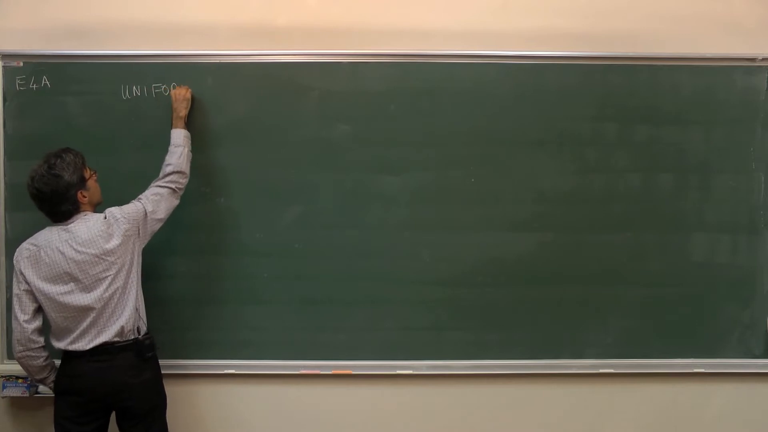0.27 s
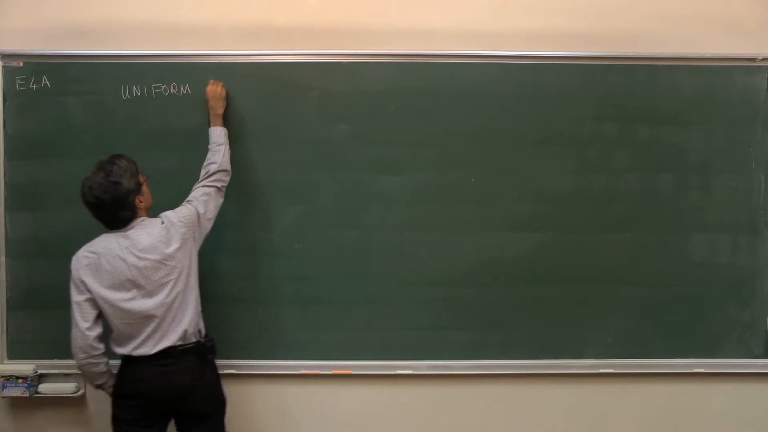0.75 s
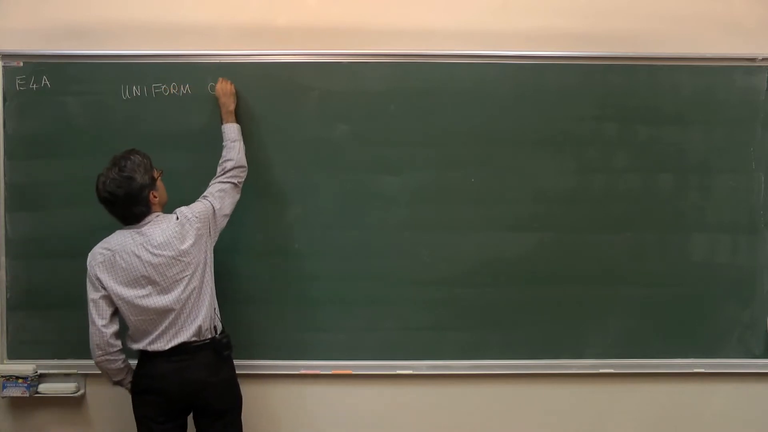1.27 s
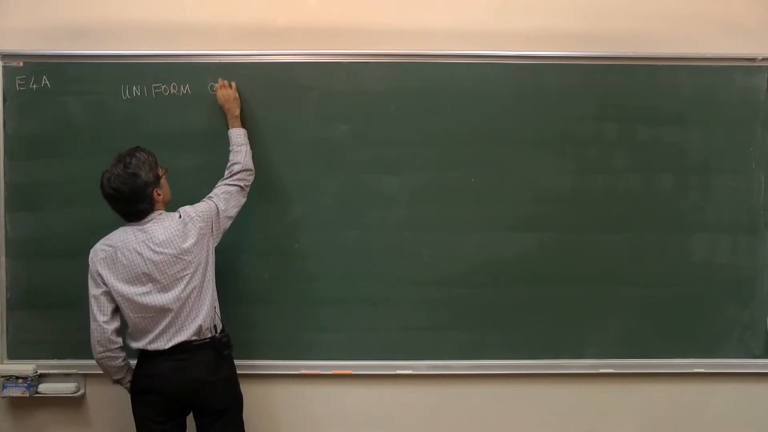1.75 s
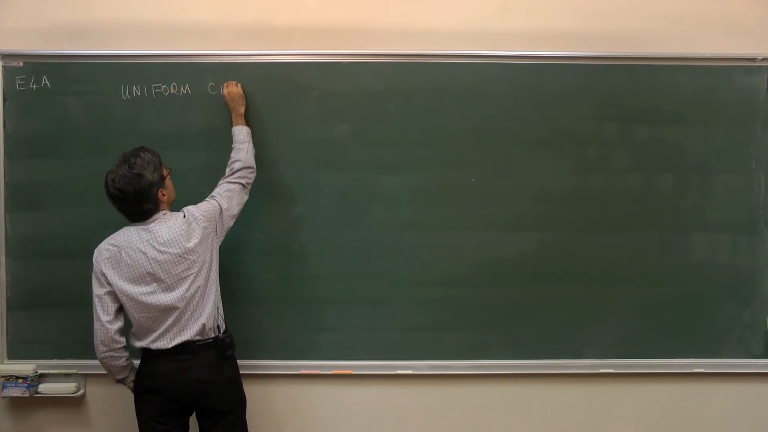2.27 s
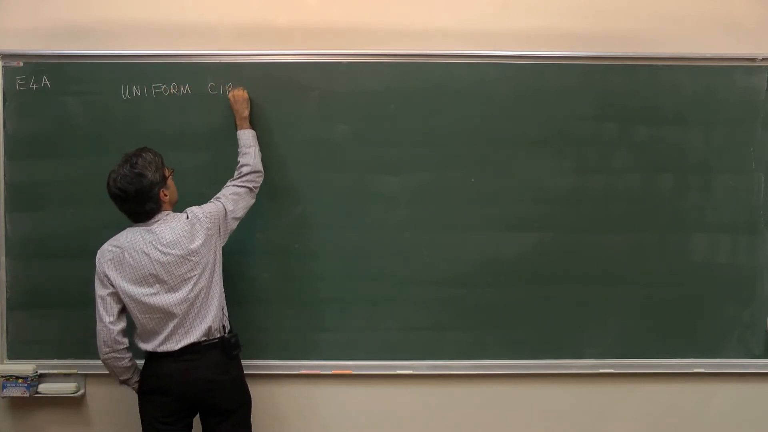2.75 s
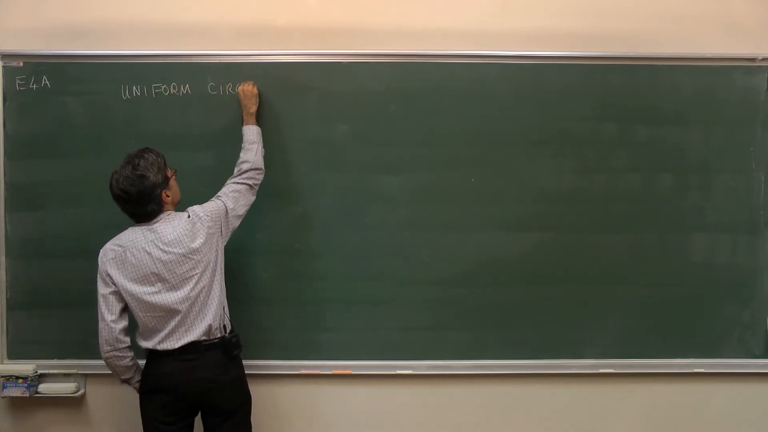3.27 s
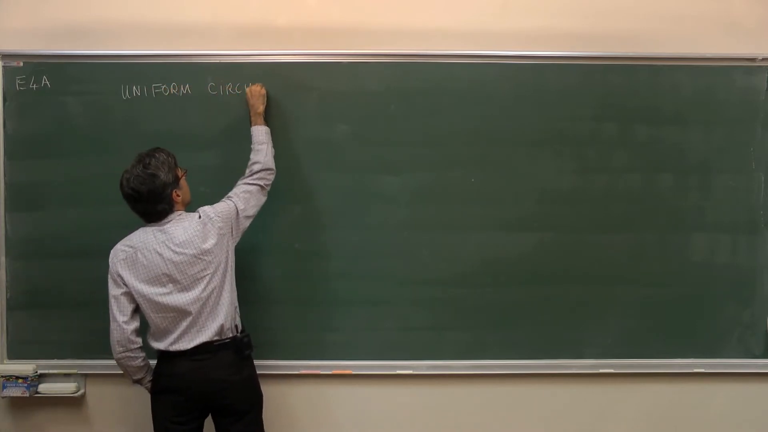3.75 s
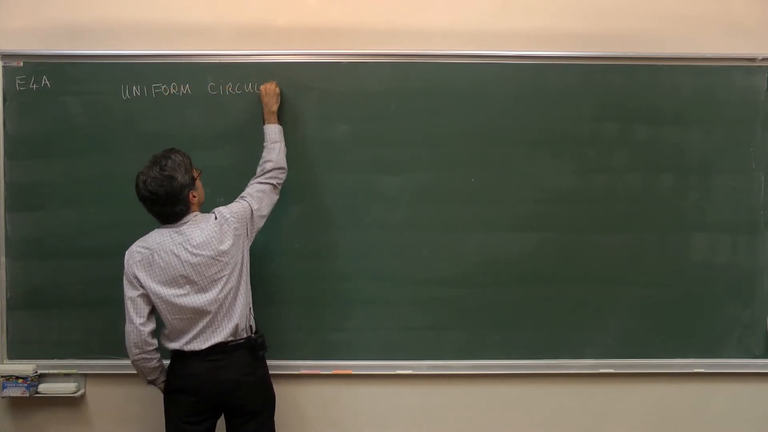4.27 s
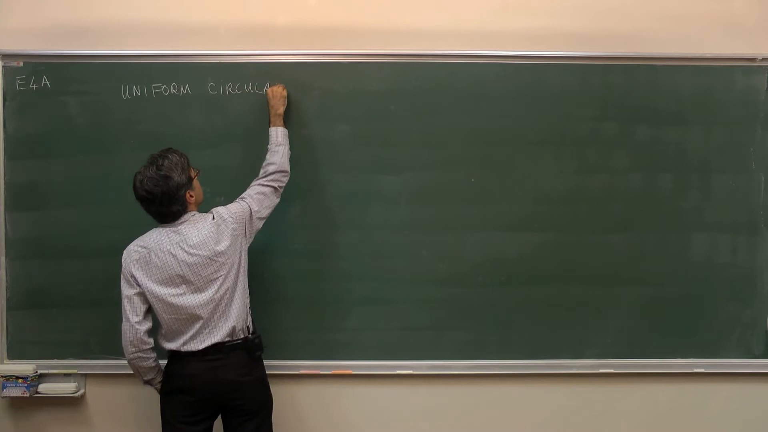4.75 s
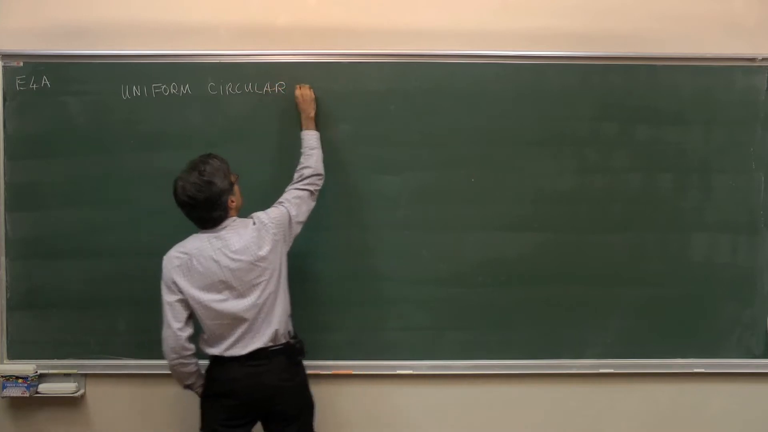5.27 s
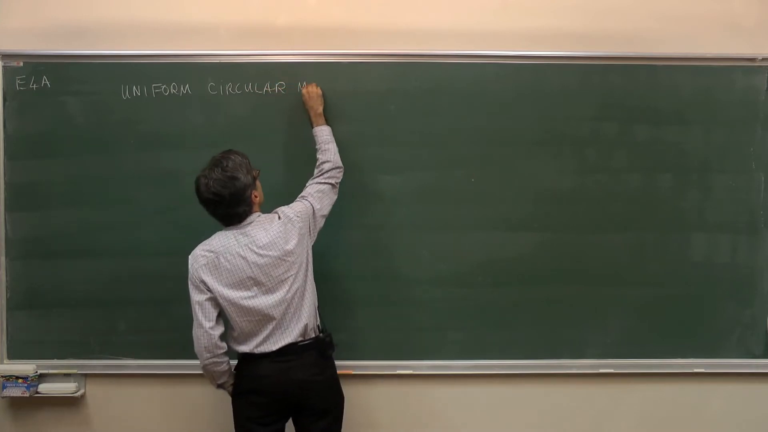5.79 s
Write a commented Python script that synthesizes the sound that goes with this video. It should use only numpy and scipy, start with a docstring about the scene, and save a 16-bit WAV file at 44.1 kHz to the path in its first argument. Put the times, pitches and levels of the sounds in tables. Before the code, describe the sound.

Chalk knocks hard on a blackboard and hisses in short scratchy strokes as someone writes capital letters in a quiet, lightly echoing room.

```python
"""Chalk capitals on a blackboard

Capital letters are written with chalk on a wall blackboard in a lecture room, over faintly rumbling ventilation.
The stick lands with hard knocks: damped modes of the spot and the panel, a noise wash, echoes and a room tail.
Filtered noise then hisses along each stroke under the swing of the hand and drives a panel mode; crumbs snap.
On some strokes the stick rasps in a rising resonance, and twice it shudders as a stroke ends."""
import sys
import numpy as np
from scipy import signal
from scipy.fft import rfft, irfft, next_fast_len
from scipy.io import wavfile

SR = 44100
rng = np.random.default_rng(int(sys.argv[2]) if len(sys.argv) > 2 else 0)


def inscribe(sig):
    """Save sig as 16-bit PCM at rate SR to the path in sys.argv[1].

    A 1-D sig is mono; a 2-D sig holds one channel per row.
    Samples are clipped to [-1, 1] before scaling.
    """
    pcm = np.round(np.clip(np.atleast_2d(sig).T, -1, 1) * 32767)
    wavfile.write(sys.argv[1], SR, pcm.astype(np.int16))


N = 265482
TIME = np.arange(N) / SR
TAIL = TIME[:SR * 4 // 5]  # time axis of one blow or tail, 0.8 s

# chalk landings: [t/s, level/dB, knock f/Hz, upper-middle edge/dB, treble crack/dB]
# the knock pitch acts relative to the mean of its column
LANDINGS = [(0.0952, -21, 1782, 5, -14.5), (0.8055, -21.5, 1750, 18, -19.5), (1.1178, -17.5, 1857, 14, -15),
            (1.3948, -20, 1870, 10.5, -11.5), (2.3045, -23.5, 1700, 10.5, -9), (2.9227, -21, 1666, 4.5, -5),
            (3.2977, -21, 1645, 9, -4.5), (3.7234, -23, 1670, 8, 0), (4.05, -22, 1850, 10, -7),
            (4.2592, -20.5, 1870, 11.5, -4.5), (4.4753, -19.5, 1670, 8, -5), (4.6582, -22.5, 1864, 9.5, 2),
            (5.3677, -22, 1670, 12, -7), (5.9487, -24, 1910, 12.5, -6)]

# the panel's drumming mode weakens as the hand travels away from the panel's edge
BOOM_HZ, BOOM_T60_S = 261.5, 0.25
BOOM_START_DB, BOOM_FADE_DB_PER_S = -2, 8


def from_db(db):
    """Turn decibels into an amplitude factor."""
    return 10 ** (np.asarray(db) / 20)


def rms_one(x):
    """Scale to rms 1."""
    return x / np.sqrt(np.mean(x ** 2) + 1e-20)


def unit_blow(x):
    """Scale to the energy of ten milliseconds at rms 1."""
    return x * np.sqrt(SR / 100 / np.sum(x ** 2))


def at_hz(points, hz):
    """Read a table on a log-frequency axis."""
    f, value = np.transpose(points)
    return np.interp(np.log(np.maximum(hz, 1)), np.log(f), value)


def add(track, start_s, sound):
    """Mix a sound into a track from a given time."""
    i = max(0, round(start_s * SR))
    track[i:i + len(sound)] += sound[:N - i]


def band(x, low_hz, high_hz, order=2):
    """Keep one frequency band."""
    edges = [low_hz, min(high_hz, .45 * SR)]
    return signal.sosfilt(signal.butter(order, edges, "band", fs=SR, output="sos"), x + 1e-18)


def peak(x, centre_hz, gain_db, q):
    """A bell-shaped lift or cut around one frequency."""
    w = 2 * np.pi * min(centre_hz, .45 * SR) / SR
    a = from_db(gain_db / 2)
    k = np.sin(w) / (2 * q)
    numerator = [1 + k * a, -2 * np.cos(w), 1 - k * a]
    denominator = [1 + k / a, -2 * np.cos(w), 1 - k / a]
    return signal.lfilter(numerator, denominator, x)


def coloured(spectrum, size):
    """Noise with a given spectrum, rms 1."""
    n = next_fast_len(size)
    white = rfft(rng.standard_normal(n))
    gain = from_db(at_hz(spectrum, np.fft.rfftfreq(n, 1 / SR)))
    return rms_one(irfft(white * gain, n)[:size])


def drift(rate_hz):
    """Smooth random wandering, rms 1, from white noise through two equal lowpass poles."""
    r = np.exp(-2 * np.pi * rate_hz / SR)
    noise = rng.standard_normal(N + SR)
    return rms_one(signal.lfilter([1], [1, -2 * r, r * r], noise)[SR:])


def ring(hz, db, t60_s):
    """One struck mode: a sine that decays exponentially."""
    return from_db(db - 60 * TAIL / max(t60_s, 1e-4)) * np.sin(2 * np.pi * hz * TAIL)


def ventilation(level_db=-62.5):
    """Steady air noise, strongest in the bass."""
    # air spectrum: [f/Hz, level/dB]
    air_colour = [(20, -36.5), (40, -8), (55, -9), (80, -2), (110, -9), (145, -7), (250, -11), (480, -21.5),
                  (1100, -25), (2000, -30), (4500, -38.5), (9000, -39), (16000, -43.5)]
    return from_db(level_db) * coloured(air_colour, N)


def room_tail(colour, build_s=0.0023):
    """Diffuse reverberation that builds up quickly and decays at a different rate in each frequency region."""
    # room decay: [f/Hz, t60/s]
    decay_times = [(80, 1), (300, 0.53), (700, 0.33), (2000, 0.48), (5000, 0.42), (14000, 0.059)]
    noise = rfft(coloured(colour, len(TAIL)))
    hz = np.fft.rfftfreq(len(TAIL), 1 / SR)
    centres, t60s = np.transpose(decay_times)
    tail = np.zeros(len(TAIL))
    for one, t60_s in zip(np.eye(len(centres)), t60s):
        share = at_hz(np.c_[centres, one], hz)  # overlapping bands that sum to one
        tail += irfft(noise * share, len(TAIL)) * from_db(-60 * TAIL / t60_s)
    return unit_blow(tail * (1 - np.exp(-TAIL / build_s)))


def sliding_in_room(sliding, wet_db=-11):
    """The room carries the sliding chalk on into its pauses, by convolution with a diffuse tail."""
    # colour of the room for the sliding sounds: [f/Hz, level/dB]
    sliding_colour = [(200, 0), (2000, -6.5), (8000, -10.5), (16000, 0.5)]
    tail = room_tail(sliding_colour)
    wet = signal.fftconvolve(sliding.mean(axis=0), tail / np.linalg.norm(tail))[:N]
    return from_db(wet_db) * wet


def boom_level(s):
    """How strongly the drumming mode answers at the place the hand has reached by time s, in dB."""
    return BOOM_START_DB - BOOM_FADE_DB_PER_S * s


def drumming(friction, width_hz=19, drive_db=24.5):
    """Friction keeps the panel's drumming mode going through a narrow resonator."""
    r = np.exp(-np.pi * width_hz / SR)
    drive = friction * from_db(boom_level(TIME) + drive_db)
    numerator = np.array([1, 0, -1]) * (1 - r * r) / 2
    denominator = [1, -2 * r * np.cos(2 * np.pi * BOOM_HZ / SR), r * r]
    return signal.lfilter(numerator, denominator, drive + 1e-18)


def crumbs(t60_s=0.02):
    """Larger crumbs snap under the tip, each a short dry burst of decaying band noise."""
    # snaps: [t/s, level/dB]
    snaps = [(4.19, -58), (5.127, -48)]
    out = np.zeros(N)
    for s, db in snaps:
        crackle = band(rng.standard_normal(len(TAIL)), 1200, 7500) * from_db(-60 * TAIL / t60_s)
        add(out, s, from_db(db) * unit_blow(crackle))
    return out


def shudders(t60_s=0.1, rise_s=.004, bump_db=-2.0, bounce_db=-5):
    """A few quick bounces of the tip as a fast-fading sine, over a dull noise bump of the board."""
    # shudders as the stick leaves the board: [t/s, bounce f/Hz, level/dB]
    departures = [(0.5635, 512, -38.5), (5.1632, 500, -40.5)]
    out = np.zeros(N)
    for s, hz, db in departures:
        fade = np.exp(-(hz * TAIL / 4) ** 2)
        bounces = 2 * from_db(bounce_db) * np.sin(2 * np.pi * hz * TAIL) * fade
        thump = rms_one(band(rng.standard_normal(len(TAIL)), hz / 2, hz * 1.2))
        bump = from_db(bump_db - 60 * TAIL / t60_s) * thump
        add(out, s, from_db(db) * (1 - np.exp(-TAIL / rise_s)) * (bounces + bump))
    return out


def rasps(width_hz=310, rise_oct_per_s=3.5, rasp_db=-1.5, chatter_db=3.0):
    """Uneven stick-slip drives a rising resonance of the stick and shakes the board under it."""
    # rasps: [start t/s, end t/s, mid-rasp f/Hz, level/dB]
    rasp_spans = [(0.158, 0.256, 2715, -50.5), (0.384, 0.472, 2740, -51), (0.526, 0.602, 2270, -62),
                  (2.482, 2.548, 2240, -57), (2.668, 2.7, 3350, -56.5), (3.469, 3.523, 3055, -54.5),
                  (4.801, 4.862, 3250, -54), (4.987, 5.045, 2940, -51.5), (5.11, 5.149, 1967, -54.5),
                  (5.514, 5.575, 2770, -55), (5.657, 5.732, 2870, -57)]
    out = np.zeros(N)
    sway = drift(width_hz) + 1j * drift(width_hz)  # widens the moving tone into narrow noise
    board = rms_one(band(rng.standard_normal(N), 1400, 3500, order=3))
    for start, end, mid_hz, db in rasp_spans:
        length = max(end - start, .01)
        along = np.clip((TIME - start) / length, 0, 1)
        pitch_hz = mid_hz * 2 ** (rise_oct_per_s * length * (along - .5))
        phase = 2 * np.pi * np.cumsum(pitch_hz) / SR
        stick = (sway * np.exp(1j * phase)).real
        swell = 2 * np.sqrt(along * (1 - along))
        out += from_db(db) * swell * (stick + board)
    return out * from_db(rasp_db + chatter_db * drift(190))


def ridges(hz, spacing_hz):
    """An uneven random row of peaks and dips across frequency, spread about 1."""
    knots = np.arange(0, SR, spacing_hz)
    return np.interp(hz, knots, rng.standard_normal(len(knots))) * np.sqrt(3 / 2)


def hand_speed(size, lifts, lift_at=0.7, swell=0.5, release_s=0.009):
    """The hand speeds up and slows to a stop at the next turn, unless the chalk lifts off first."""
    along = np.linspace(0, lift_at if lifts else 1, size)  # fraction of the swing
    release = np.minimum(np.arange(size)[::-1] / (release_s * SR), 1)
    return np.abs(np.sin(np.pi * along)) ** swell * release


def strokes(grain_db=1.56, pressure_db=2.1, level_db=0.9, side_db=-13):
    """Grains break off the sliding tip; stick and board filter them through ridges that shift with every stroke."""
    # strokes of the letters, each one swing of the hand, and a few faint brushes between them: [start t/s, end
    # t/s, hiss level/dB]
    swings = [(0.148, 0.261, -61.5), (0.273, 0.375, -63.5), (0.387, 0.472, -60.5), (0.493, 0.599, -62.5),
              (0.728, 0.836, -70.5), (0.801, 1.06, -60.5), (1.002, 1.088, -72), (1.132, 1.225, -65),
              (1.443, 1.476, -68), (1.721, 1.84, -85.5), (1.919, 2.055, -74), (2.323, 2.435, -63),
              (2.456, 2.562, -59.5), (2.564, 2.656, -63.5), (2.672, 2.702, -68), (2.723, 2.825, -62),
              (2.921, 3.15, -66.5), (3.294, 3.43, -66), (3.437, 3.52, -63), (3.543, 3.643, -65),
              (3.644, 3.665, -60), (3.727, 3.86, -66.5), (3.863, 3.947, -66), (4.044, 4.169, -62.5),
              (4.186, 4.194, -55), (4.258, 4.394, -62.5), (4.491, 4.6, -63), (4.654, 4.768, -61),
              (4.789, 4.977, -61), (4.969, 5.047, -62.5), (5.079, 5.161, -62.5), (5.381, 5.53, -60.5),
              (5.525, 5.638, -61), (5.644, 5.73, -61), (5.748, 5.854, -62), (5.859, 5.885, -61.5),
              (5.97, 6.034, -61)]
    # chalk crumbling on the board: [f/Hz, level/dB]
    hiss_colour = [(100, 1.5), (300, 11.5), (900, 5.5), (1700, 6.5), (2700, 7), (4500, 3), (5600, 3.5),
                   (7200, -.5), (8700, 2), (10800, -5.5), (12800, -4.5), (14700, -2.5), (16000, -4.5)]
    lift_pause_s = 0.06  # a longer pause means the chalk lifts off
    fresh_sheen_db, worn_sheen_db, wear_s = 7.0, 0.0, 0.7  # a fresh edge hisses higher, then wears blunt
    n = next_fast_len(SR // 2)
    hz = np.fft.rfftfreq(n, 1 / SR)
    board_db = at_hz(hiss_colour, hz)
    top = at_hz([(9000, 0), (14000, 1)], hz)  # where the sheen acts
    out, effort = np.zeros(N), np.zeros(N)
    next_starts = [row[0] for row in swings[1:]] + [np.inf]
    for (start, end, db), next_start in zip(swings, next_starts):
        size = int(np.clip((end - start) * SR, 2, n))
        speed = from_db(db) * hand_speed(size, next_start - end > lift_pause_s)
        sheen_db = worn_sheen_db + (fresh_sheen_db - worn_sheen_db) * np.exp(-start / wear_s)
        colour_db = board_db + sheen_db * top + 2.6 * ridges(hz, spacing_hz=200)
        noise = irfft(rfft(rng.standard_normal(n)) * from_db(colour_db), n)
        noise = noise / np.std(band(noise, 6500, 16000))  # even treble from stroke to stroke
        add(out, start, speed * noise[:size])
        add(effort, start, speed)
    spread = from_db(side_db) * effort * rms_one(band(rng.standard_normal(N), 3500, 16700))
    stereo = out + spread * np.array([[1], [-1]])  # opposite sign left and right widens the hiss
    return from_db(level_db + grain_db * drift(210) + pressure_db * drift(25)) * stereo


def disperse(x, centre_hz, width_hz):
    """Smear the attack as bending waves do: an allpass delays the region around one frequency most."""
    r = np.exp(-np.pi * width_hz / SR)
    a = [1, -2 * r * np.cos(2 * np.pi * centre_hz / SR), r * r]
    return signal.lfilter(a[::-1], a, x + 1e-18)


def knock(pitch_hz, echo_hz=7000, crush_db=-18, crush_t60_s=0.012, contact_s=0.00068):
    """The first crack of a landing: damped modes, a crushing tip and early returns of varying path length."""
    # the spot under the chalk, heavily damped: [f/Hz, level/dB, t60/s]
    spot_modes = [(1890, 6, 0.0034), (120.4, 3.5, 0.0056), (2950, 7.5, 0.0019), (291, -15, 0.014),
                  (5400, -12, .006), (8500, 3.5, 0.00094), (14310, -45.5, .003)]
    # early returns from the frame, ceiling and floor: [delay t/s, level/dB]
    early_returns = [(.0028, -10), (.0039, -15), (.0056, -16), (.0222, -19), (.0262, -19)]
    stretch = pitch_hz / np.mean(np.array(LANDINGS)[:, 2])
    contact = 1 - np.exp(-TAIL / contact_s)
    modes = sum((-1) ** k * ring(hz * stretch, db, t60_s) for k, (hz, db, t60_s) in enumerate(spot_modes))
    direct = unit_blow(disperse(contact * modes, centre_hz=1574, width_hz=330))
    # the tip crushes a little as it lands
    crush = band(rng.standard_normal(len(TAIL)), 3000, 9000, order=1)
    crush = crush * contact * from_db(-60 * TAIL / crush_t60_s)
    direct = direct + from_db(crush_db) * unit_blow(crush)
    dull = band(direct, 30, echo_hz, order=1)
    out = direct.copy()
    for (delay_s, db), path in zip(early_returns, rng.normal(1, .04, len(early_returns))):
        out += from_db(db) * np.interp(TAIL - delay_s * path, TAIL, dull, left=0)
    return out


def panel_modes():
    """The struck panel and stick ring in decaying modes, slightly detuned and re-balanced at each landing."""
    # modes of the whole panel, then of the stick: [f/Hz, level/dB, t60/s]
    body_modes = [(48, 3, 0.077), (89.1, -15.5, 0.79), (148.4, -7.5, 0.39), (221, -12.5, 0.3),
                  (274, 16, 0.024), (362, -5.5, 0.21), (410, -11, .12), (776, 1.5, 0.1), (1480, -14, 0.05),
                  (2130, -12, 0.068), (3874, 3, 0.03), (5590, -8, 0.02)]
    detune = rng.normal(1, .02, len(body_modes))
    scatter_db = rng.normal(0, 2, len(body_modes))
    out = np.zeros(len(TAIL))
    for k, (hz, db, t60_s) in enumerate(body_modes):
        out += (-1) ** k * ring(hz * detune[k], db + scatter_db[k], t60_s)
    return unit_blow(out)


def panel_wash(t60_s=0.071, rise_s=0.0008):
    """Dense bending waves between the panel's modes, as decaying coloured noise."""
    # wash spectrum: [f/Hz, level/dB]
    wash_colour = [(40, -4), (150, 3), (350, -6.5), (600, -10), (950, -16.5), (1300, -4.5), (2100, -7),
                   (2700, -24.5), (3600, -18), (4600, -32), (5500, -29), (6800, -50), (16000, -73.5)]
    decay = from_db(-60 * TAIL / t60_s) * (1 - np.exp(-TAIL / rise_s))
    return unit_blow(coloured(wash_colour, len(TAIL)) * decay)


def taps(knock_db=1.8, panel_db=-2, wash_db=-1, room_db=-7):
    """Each landing sounds the spot, the panel and the room, coloured by how the tip meets the slate."""
    # colour of the room's tail: [f/Hz, level/dB]
    room_colour = [(40, -15.5), (85, -1.5), (170, -3), (290, 8), (480, 0), (700, 3.5), (1000, -0.5),
                   (1800, 1.5), (2600, -13), (3600, -12), (4700, -17.5), (5600, -12.5), (8000, -27),
                   (16000, -38.5)]
    out = np.zeros(N)
    for s, db, pitch_hz, edge_db, crack_db in LANDINGS:
        blow = from_db(knock_db) * knock(pitch_hz)
        blow += from_db(panel_db) * panel_modes()
        blow += from_db(wash_db) * panel_wash()
        blow += from_db(room_db) * room_tail(room_colour)
        # a square landing both cracks and pushes the panel, so the thud follows the crack
        blow = peak(blow, centre_hz=67, gain_db=-6.4 + 0.37 * crack_db, q=0.38)
        blow = peak(blow, centre_hz=2640, gain_db=edge_db, q=3.1)
        blow = peak(blow, centre_hz=9300, gain_db=crack_db, q=0.4)
        boom = ring(BOOM_HZ, boom_level(s), BOOM_T60_S)
        add(out, s, from_db(db) * (blow + boom))
    return out


def scene():
    """Ventilation, the sliding chalk with its room sound, and the landings on top."""
    air = ventilation()
    hiss = strokes()
    sliding = hiss + drumming(hiss.mean(axis=0)) + crumbs() + shudders() + rasps()
    return air + sliding_in_room(sliding) + sliding + taps()


def record(dry, low_cut_hz=40, ceiling=0.55, cutoff_hz=15900):
    """The microphone loses the deepest bass, the highest peaks are rounded and the top is cut steeply."""
    lean = signal.sosfilt(signal.butter(2, low_cut_hz, "high", fs=SR, output="sos"), dry)
    rounded = lean / (1 + (lean / ceiling) ** 4) ** (1 / 4)
    return signal.sosfilt(signal.ellip(10, .1, 80, cutoff_hz, fs=SR, output="sos"), rounded)


dry = scene()
out = record(dry)
inscribe(out)
```